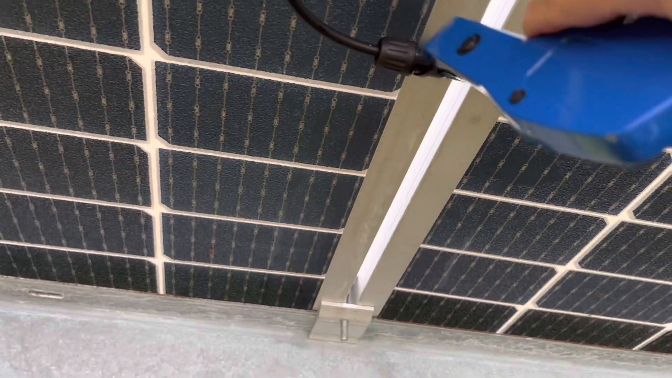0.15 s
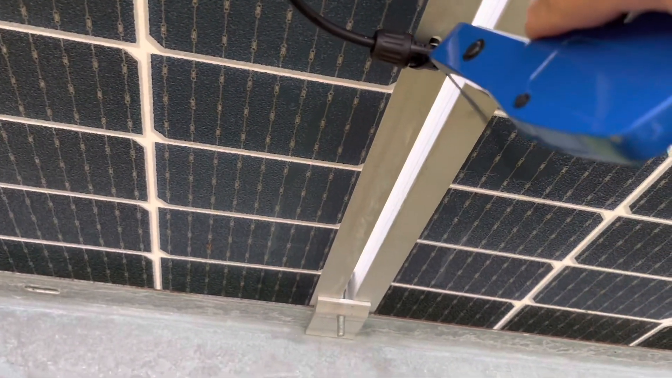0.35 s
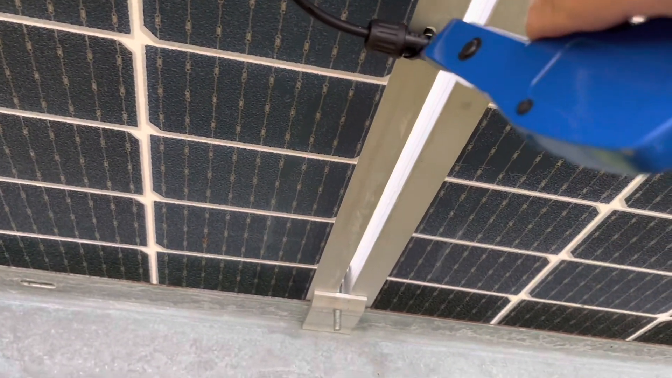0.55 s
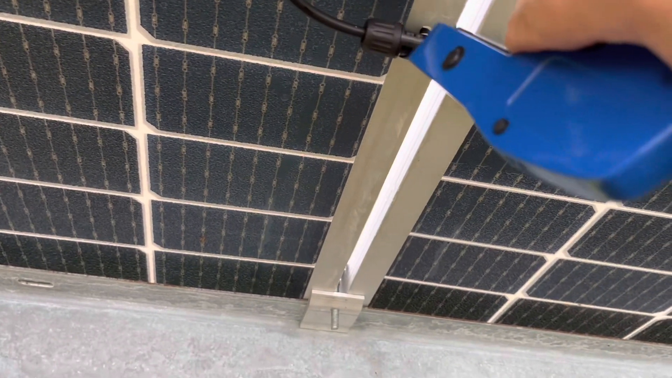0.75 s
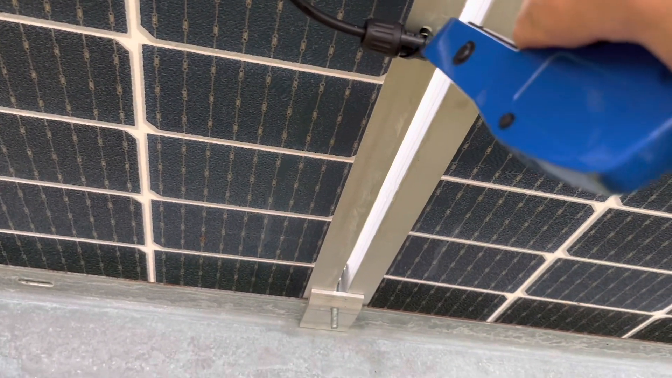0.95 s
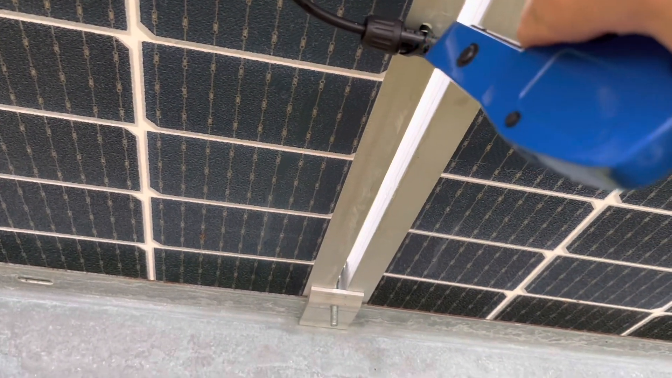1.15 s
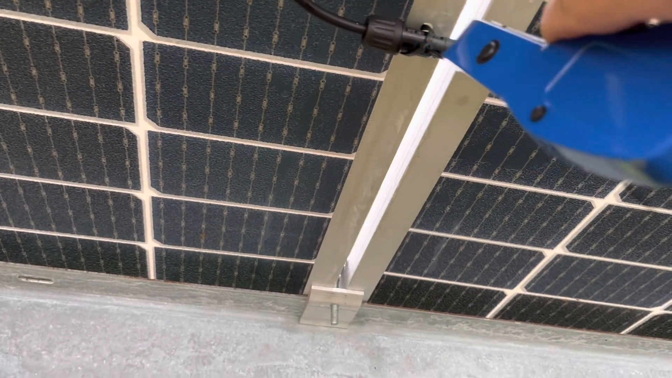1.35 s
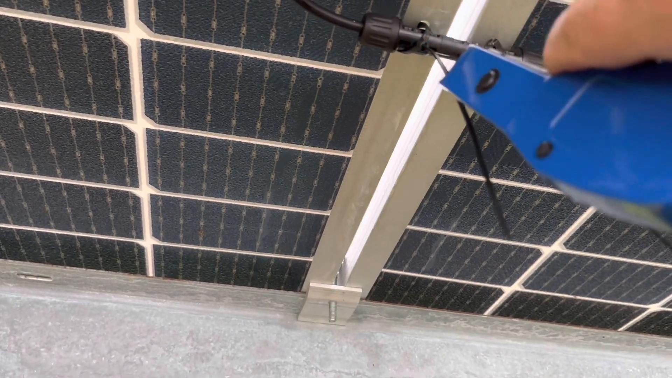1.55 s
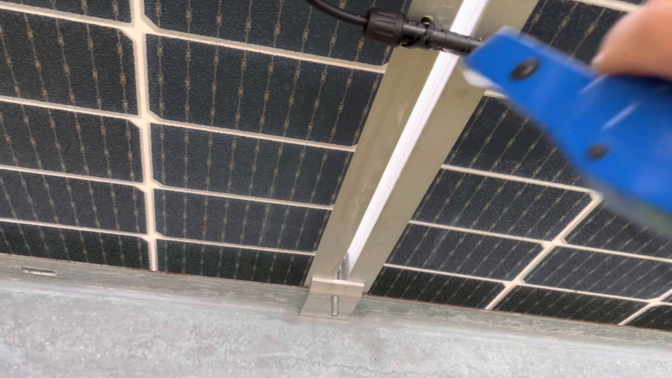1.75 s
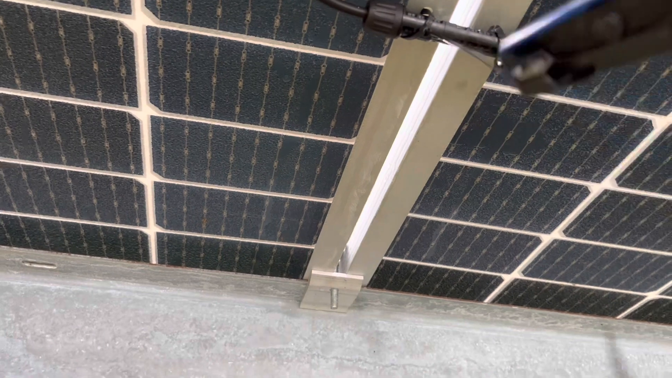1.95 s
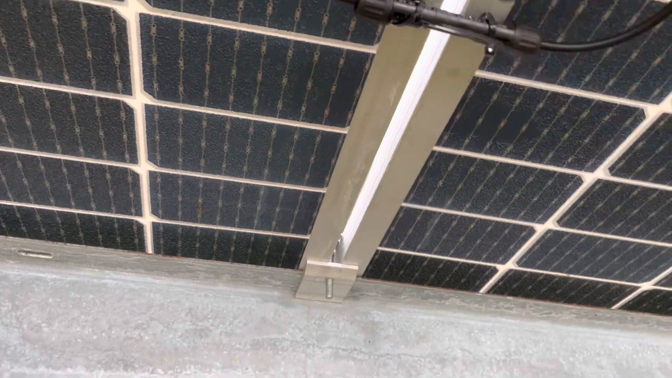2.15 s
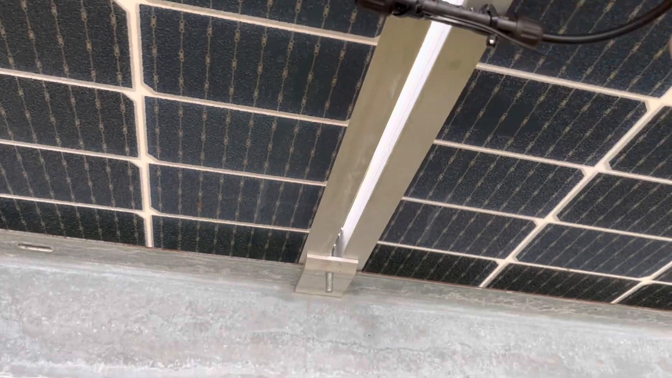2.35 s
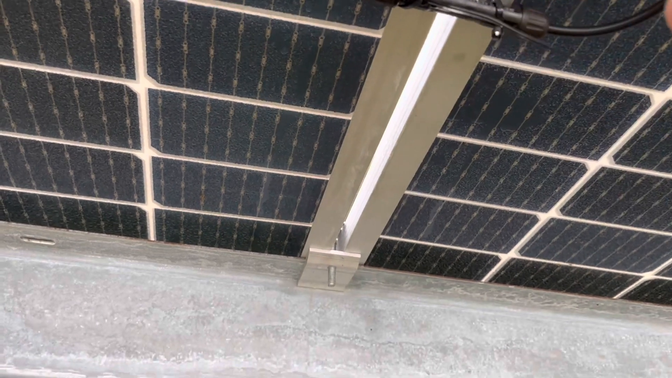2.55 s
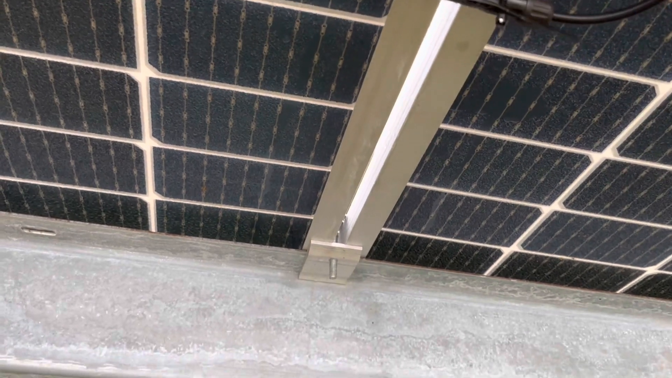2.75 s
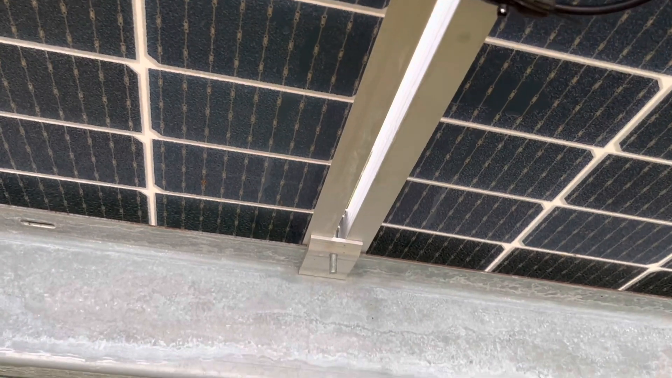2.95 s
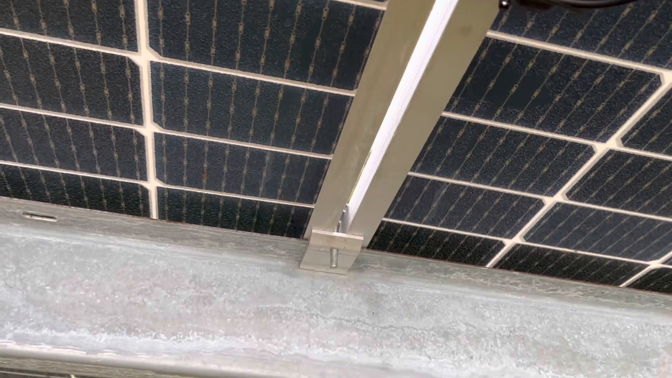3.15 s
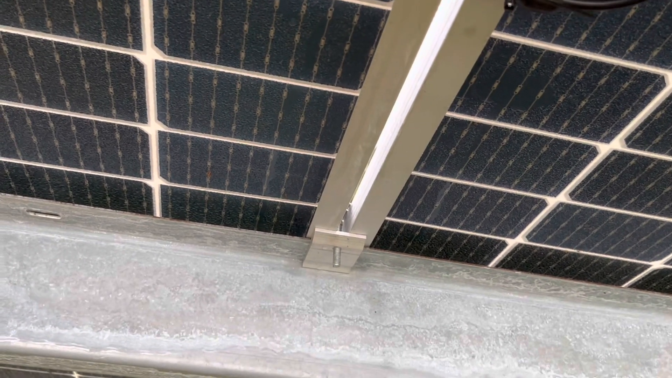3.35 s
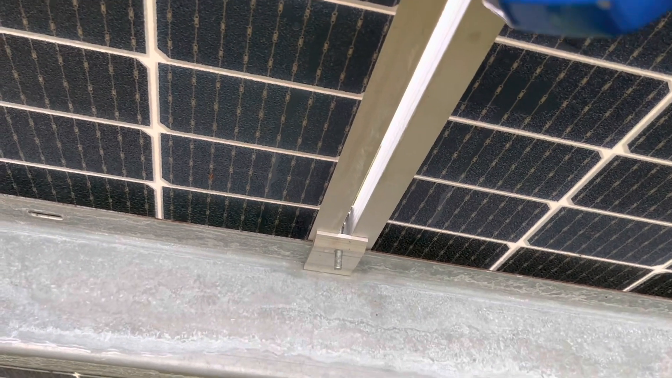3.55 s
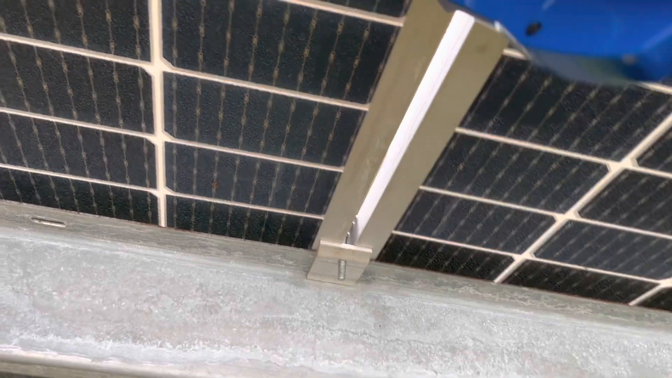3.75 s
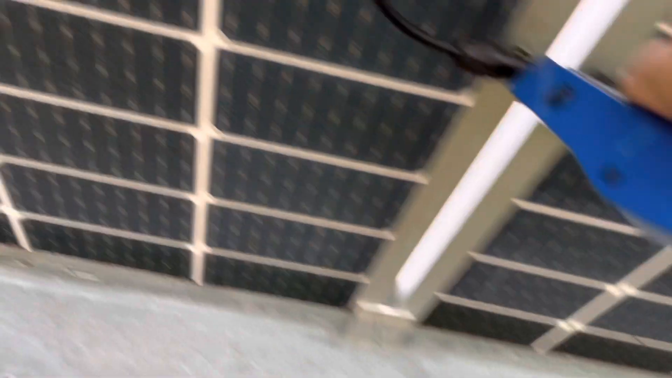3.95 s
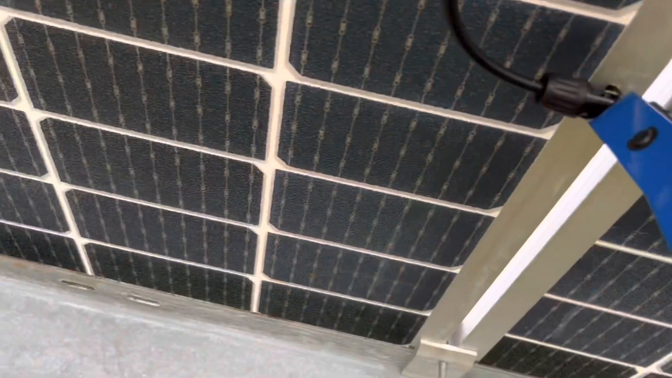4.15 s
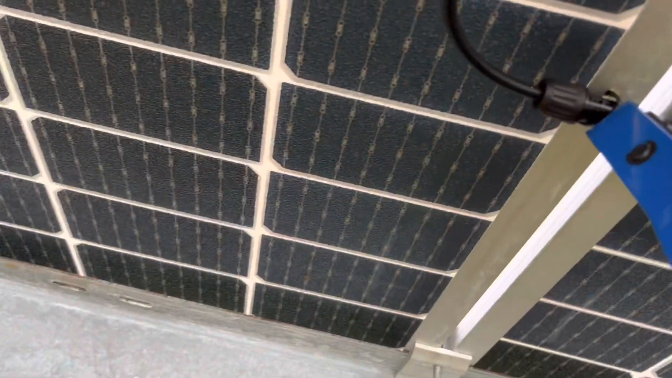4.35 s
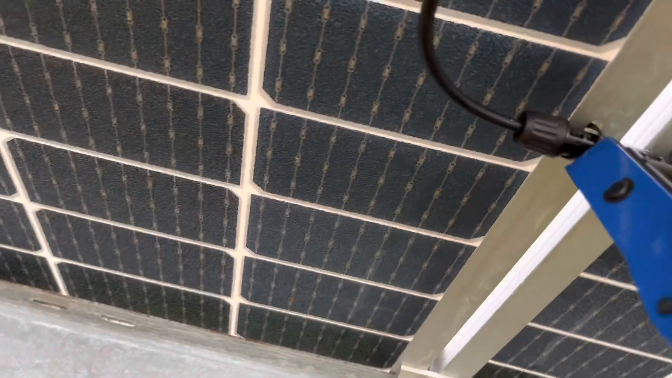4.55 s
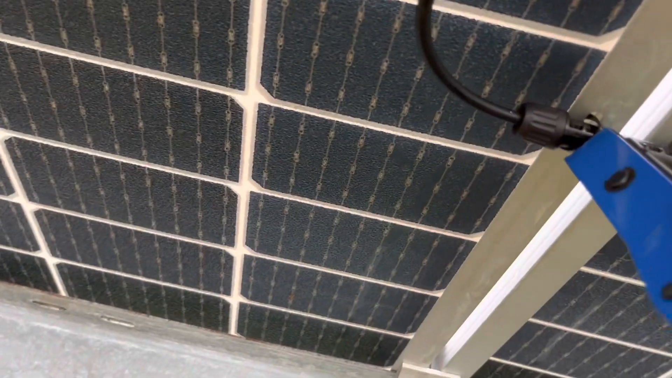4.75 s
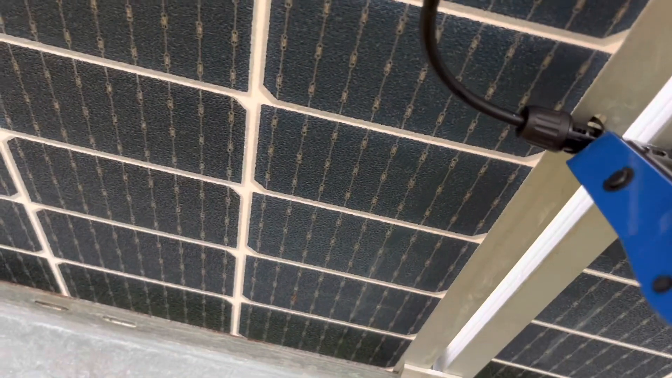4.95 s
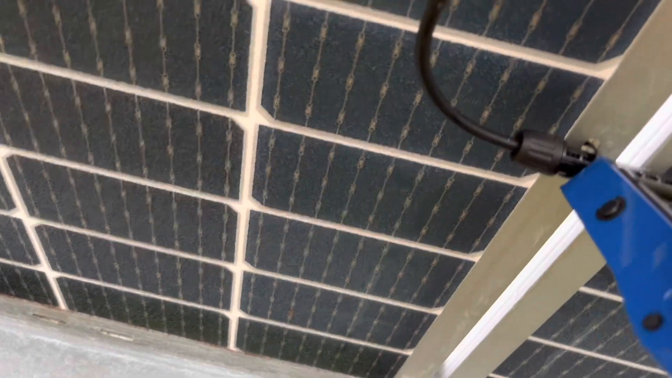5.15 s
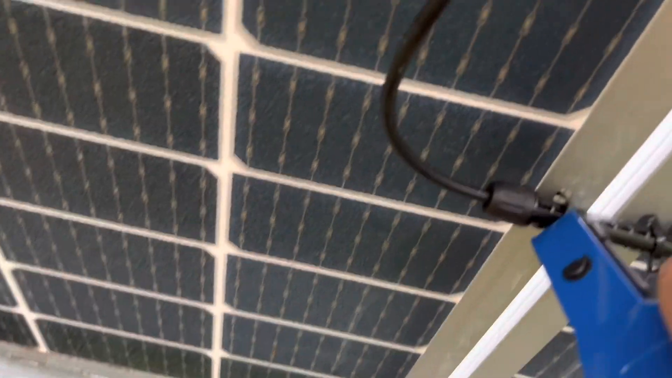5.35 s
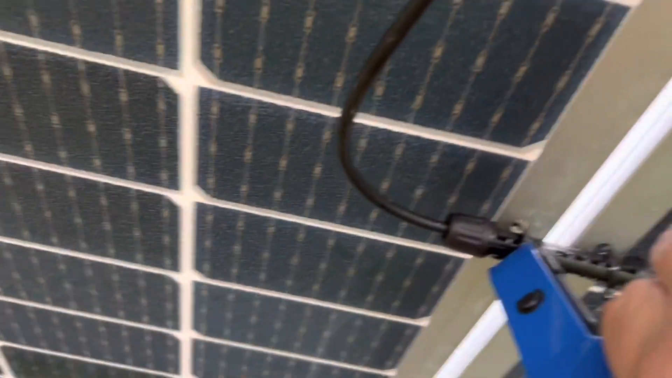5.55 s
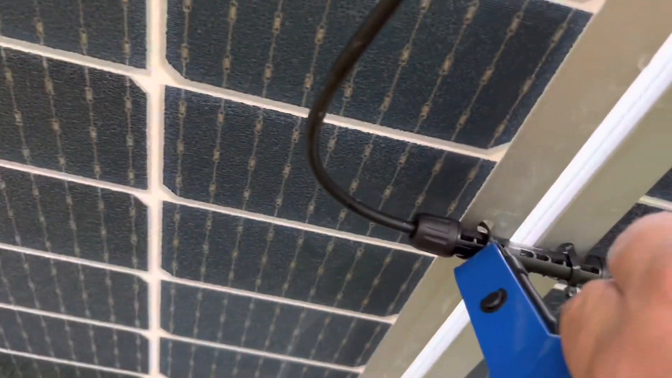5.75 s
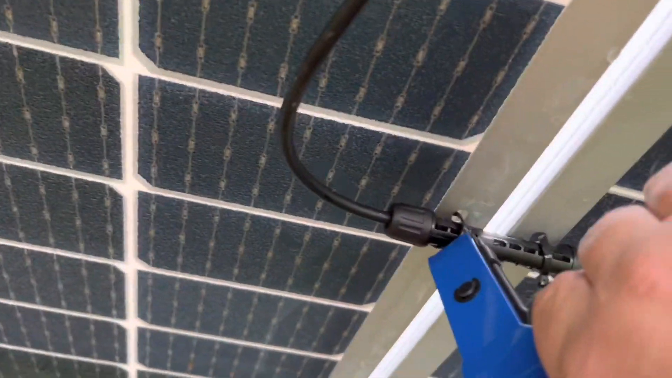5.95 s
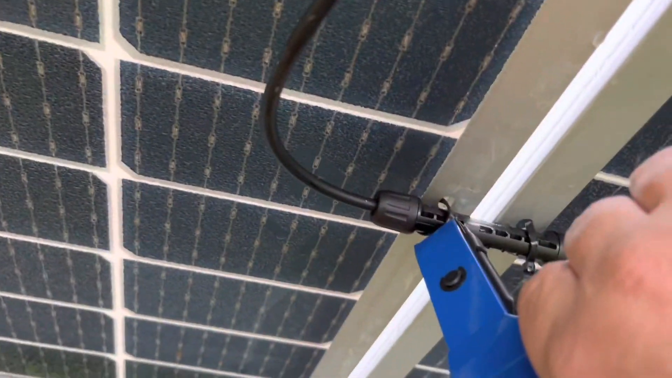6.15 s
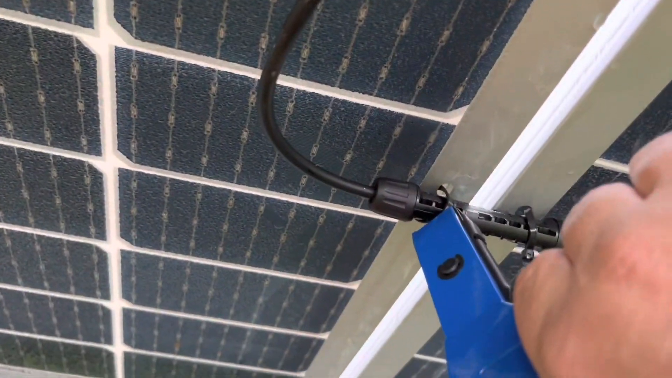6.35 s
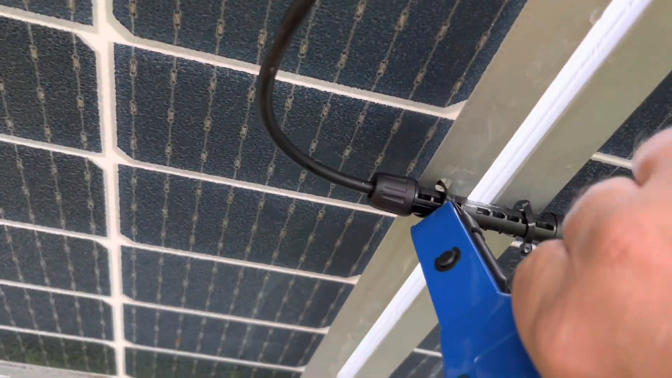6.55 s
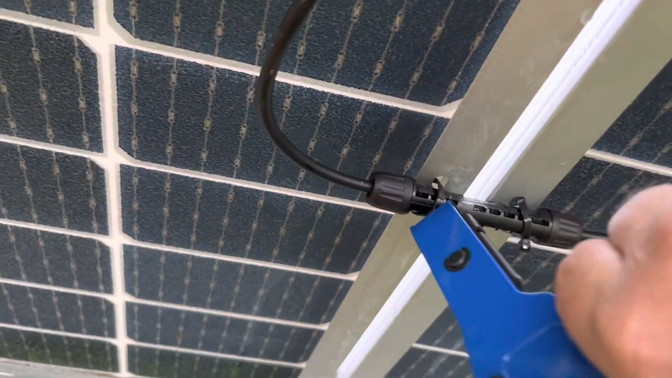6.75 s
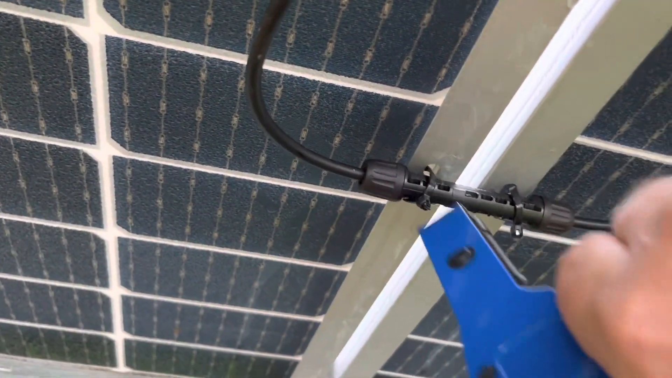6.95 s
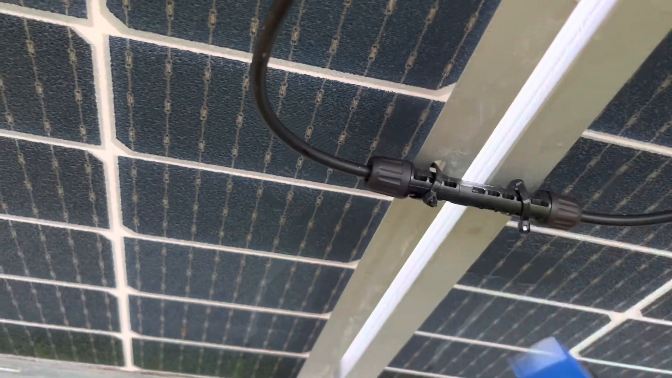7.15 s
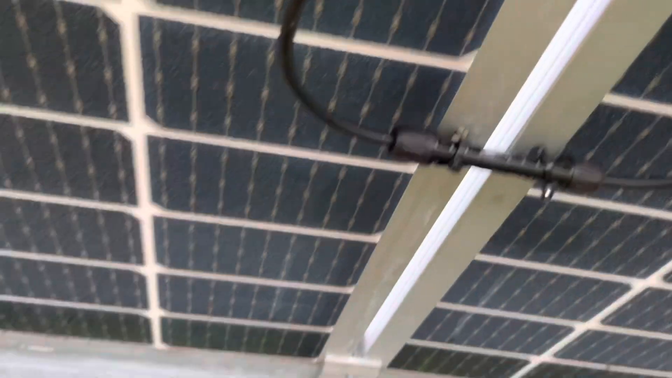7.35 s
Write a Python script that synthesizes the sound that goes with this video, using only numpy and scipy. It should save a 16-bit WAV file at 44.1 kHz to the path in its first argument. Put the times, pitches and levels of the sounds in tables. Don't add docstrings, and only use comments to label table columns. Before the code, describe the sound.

Outdoors, close to the microphone, gusty low wind rumble and a very faint high insect hiss continue for about 7.4 seconds. From 0 to 0.7 a hand rubs the tool grip, with a nose knock at 0.2, plastic scrapes, short hollow squeaks and small ticks. Strong ratchet ticks come at 1.33 and 1.78, with squeaky slides between 1.4 and 2.0 and a click at 2.26. It then quiets; a faint far bird chirps around 2.9 and 3.3. Soft bumps and rubbing return at 3.6, a dull bump at 4.15, and a bright cluster of ticks at 4.45. A short knock sounds at 5.44. Light clicks and rasping build from 6.1, then at 6.62 the tie snaps extremely loudly: sharp crack, ringing steel, rail rattle and deep boom. The tool knocks back at 6.94, and wind and a faint chirp remain.

```python
import sys
import numpy as np
from scipy import signal
from scipy.fft import rfft, irfft
from scipy.io import wavfile

SR = 44100
rng = np.random.default_rng(int(sys.argv[2]) if len(sys.argv) > 2 else 0)


def transcribe(signal):
    frames = np.atleast_2d(signal).T
    limited = np.clip(frames, -1, 1)
    pcm = np.round(limited * 32767).astype(np.int16)
    wavfile.write(sys.argv[1], SR, pcm)


N = 325899


def from_db(db):
    return 10 ** (np.asarray(db) / 20)


def in_time(rows):
    s, *columns = np.transpose(rows)
    return [np.interp(np.arange(N) / SR, s, c, left=-120, right=-120) for c in columns]


# f/Hz, side level/dB re mid
WIDTH = [(100, -15.5), (300, -10.5), (600, -5), (1200, 1), (2400, -9), (4400, -5), (8000, 3), (13000, -10)]


def coloured(spectrum, side=WIDTH, shared=0):
    log_hz = np.log(np.arange(1, N // 2 + 2) * SR / N)

    def at_hz(points):
        hz, db = np.transpose(points)
        return np.interp(log_hz, np.log(hz), db)

    white = rfft(rng.standard_normal((2, N)))
    mid = irfft(white[0] * from_db(at_hz(spectrum)), N)
    shared = np.clip(shared, 0, 1)
    mixed = np.sqrt(1 - shared ** 2) * white[1] + 1j * shared * white[0]
    wide = irfft(mixed * from_db(at_hz(spectrum) + at_hz(side)), N)
    return np.array([mid + wide, mid - wide]) / mid.std()


def band(x, low_hz, high_hz):
    return signal.sosfilt(signal.butter(2, [low_hz, high_hz], "band", fs=SR, output="sos"), x)


def resonance(x, hz, width):
    r = np.exp(-np.pi * width / SR)
    poles = [1, -2 * r * np.cos(2 * np.pi * hz / SR), r * r]
    return signal.lfilter((1 - r * r) / 2 * np.array([1, 0, -1]), poles, x)


def steep(x, hz, width):
    return resonance(resonance(x, hz, width), hz, width)


def ring(s, hz, db, t60, rise=0.00033):
    age = np.maximum(np.arange(N) / SR - s, 0)
    envelope = from_db(db - 60 * age / t60) * (1 - np.exp(-age / rise))
    return envelope * np.sin(2 * np.pi * hz * age)


def bursts(times, peaks_db, t60s, rise=0.00028):
    out, age = np.zeros(N + SR), np.arange(SR // 2) / SR
    for s, db, t60 in zip(times, peaks_db, t60s):
        i = round(s * SR)
        out[i:i + len(age)] += from_db(db - 60 * age / np.maximum(t60, .002)) * (1 - np.exp(-age / rise))
    return out[:N]


def strokes(middles, lengths, levels_db):
    t, out = np.arange(N) / SR, 0
    for s, length, db in zip(middles, lengths, levels_db):
        out = out + from_db(db) * np.cos(np.pi * np.clip((t - s) / length, -.5, .5)) ** 2
    return out


def taps(times, peaks_db, low_hz, high_hz):
    train = np.zeros((2, N))
    at = np.round(times * SR).astype(int)[:, None] + rng.integers(0, 4, (len(times), 2))
    train[0, at[:, 0]] = train[1, at[:, 1]] = from_db(peaks_db) * SR / 2 / (high_hz - low_hz)
    return band(train + 1e-18, low_hz, high_hz)


def flutter(rate, depth_db):
    knots = rng.standard_normal(int(N / SR * 60) + 2)
    position = np.arange(N) / SR * np.minimum(rate, 59)
    return from_db(depth_db * np.interp(position, np.arange(len(knots)), knots))


def unit(x):
    return x / x.mean(axis=0).std()


# f/Hz, density/dB
AIR = [(200, -10), (300, -3), (500, -11), (900, -19.5), (1500, -19.5), (2000, -23), (2600, -29),
       (3100, -27), (4300, -31), (5300, -32), (7800, -33), (10300, -38), (11500, -62)]
# f/Hz, width/Hz, level/dB rms, side level/dB re mid
INSECTS = [
    (3506, 730, -83, -1.5),
    (6000, 610, -83, -6.5),
    (6786, 1000, -72, 0.5),
    (9235, 750, -72, 7.5),
]


def outdoors():
    air_side = [(300, -10.5), (1400, 2.0), (6000, 1.0)]
    out = from_db(-75.5) * flutter(2.5, 1.7) * coloured(AIR, side=air_side)
    for hz, width, level_db, side_db in INSECTS:
        wings = resonance(rng.standard_normal((2, N)), hz, width)
        mid, side = band(wings, hz - 0.53 * width, hz + 0.47 * width)
        stereo = mid + from_db(side_db) * side * [[1], [-1]]
        out += from_db(level_db) / mid.std() * flutter(1.5, 0.51) * stereo
    return out


# t/s, length/s, start f/Hz, end f/Hz, level/dB
BIRD = [(2.87, .045, 2570, 3030, -74), (2.904, .025, 2990, 4280, -68), (2.925, 0.047, 4200, 2660, -68.5),
        (3.299, .07, 1900, 2500, -81), (3.355, .03, 2590, 3300, -70), (3.385, 0.11, 2900, 3500, -74),
        (3.5, .07, 2800, 2720, -83), (4.714, 0.018, 2300, 2840, -70.5), (4.931, 0.023, 2190, 2500, -74),
        (5.018, 0.014, 2280, 3120, -68.5), (6.83, 0.075, 3590, 3000, -73.5), (7.068, .06, 2990, 4170, -72)]


def bird():
    t, song = np.arange(N) / SR, np.zeros(N)
    for s, length, start_hz, end_hz, db in BIRD:
        u = np.clip((t - s) / length, 0, 1)
        cycles = length * (start_hz * u + (end_hz - start_hz) * u * u / 2)
        song += from_db(db) * np.sin(np.pi * u) * np.sin(2 * np.pi * cycles)
    air = rng.standard_normal((2, SR // 2))
    song *= 1 + .6 * unit(band(np.resize(air, (1, N)), 60, 300))[0]
    echoes = air * from_db(-25 - 60 * t[:SR // 2] / .25)
    return signal.fftconvolve(song[None], echoes, axes=1)[:, :N]


# t/s, level/dB
WIND = [(0.0, -48), (0.29, -45), (0.72, -50), (1.11, -55.5), (1.5, -54.5), (2.0, -55), (2.24, -51.5),
        (2.55, -55), (2.9, -54), (3.21, -47.5), (3.77, -50.5), (4.11, -46), (4.63, -55), (5.15, -53),
        (5.4, -46.5), (5.9, -50.5), (6.57, -56), (7.39, -58)]
# f/Hz, density/dB
RUMBLE = [(12, -65.5), (20, -38.5), (27, -20.5), (42, -12.5), (98, 0.5), (129, 0), (157, -13), (170, -14.5),
          (220, -45.5), (370, -120)]
# f/Hz, density/dB
UPPER_RUMBLE = [(88, -40), (150, -10), (194, -1), (234, -6.5), (258, -18.5), (302, -22.5), (500, -52),
                (650, -62.5), (1100, -120)]
# t/s, peak level/dB, t60/s
JOLTS = [
    (6.64, -23, 0.31),
    (6.78, -35.5, 0.82),
    (6.85, -35, 0.38),
    (7.0, -45.5, .8),
]


def wind():
    wind_db, = in_time(WIND)
    low = from_db(wind_db + 1.5) + bursts(*np.transpose(JOLTS), rise=.025)
    low = low * flutter(12, 1.7)
    flap = from_db(-61.5 + 0.42 * (wind_db - wind_db.mean()))
    shaken = from_db(0.5) * strokes(*np.transpose(SQUEEZES)[:3])
    upper = (flap + shaken) * from_db(3.0) * flutter(18, 3.4)
    return (low * coloured(RUMBLE, side=[(20, -16.0), (200, -22)])
            + upper * coloured(UPPER_RUMBLE, side=[(150, -20), (500, -7)]))


# f/Hz, width/Hz, level/dB
HOUSING = [(1840, 205, 4), (2095, 190, 5), (2315, 310, -8), (2744, 170, -11)]


def housing(x):
    return unit(sum(from_db(db) * steep(x, hz, width) for hz, width, db in HOUSING))


# middle t/s, length/s, grip level/dB, housing level/dB re grip
SQUEEZES = [(0.1, 0.66, -71, -3.5), (0.418, 0.32, -60.5, -13), (0.578, .26, -60.5, -5),
            (1.0, 0.28, -78.5, -3), (1.424, 0.5, -61, -9), (1.723, .36, -62.5, -2.5),
            (2.33, 0.24, -84, -16), (3.662, .55, -66, -13), (3.986, 0.49, -67.5, -14),
            (4.152, 0.16, -56.5, -20), (4.533, 0.4, -70, -9), (5.047, 0.34, -80.5, -11),
            (5.788, 0.49, -77, -3.5), (6.397, 0.42, -77.5, 4), (6.78, 0.22, -57.5, -31),
            (6.941, 0.35, -61.5, -18)]
# middle t/s, length/s, rasp level/dB, housing level/dB re rasp
SCRAPES = [(0.068, 0.11, -71.5, -5), (0.37, 0.053, -74, 2), (0.453, 0.24, -83, 8), (0.569, 0.11, -62.5, 0),
           (1.422, 0.094, -61, 1.5), (1.495, 0.13, -76, -16), (1.719, 0.12, -58, -5),
           (1.949, 0.12, -66, -2), (2.271, 0.032, -57, -6), (2.297, 0.086, -64, -5.5),
           (3.69, 0.12, -71.5, 2), (4.027, 0.08, -77, -5), (4.494, 0.21, -65, -11),
           (4.892, 0.38, -78.5, -10), (6.017, 0.13, -78.5, -22), (6.23, 0.099, -74, -4),
           (6.37, 0.18, -64, -7)]
# middle t/s, length/s, hiss level/dB
BRUSHES = [(0.065, 0.11, -81), (1.206, 0.046, -81), (1.843, 0.051, -77), (2.757, 0.11, -75),
           (3.685, 0.11, -72.5), (4.416, 0.12, -77), (4.735, 0.12, -82), (4.892, 0.3, -81),
           (6.017, .11, -86), (6.096, .06, -85), (6.227, 0.087, -75), (6.372, 0.2, -67), (6.54, 0.13, -74),
           (6.784, 0.16, -78)]


def rubbing():
    s, length, grip_db, hollow_db = np.transpose(SQUEEZES)
    scrape_s, scrape_length, rasp_db, housing_db = np.transpose(SCRAPES)
    scraping = strokes(scrape_s, scrape_length, rasp_db)
    brushing = strokes(*np.transpose(BRUSHES))
    slips = (rng.random(N) < 90 / SR) * from_db(2.0 * np.minimum(rng.exponential(1, N), 2) - 5)
    grain = 1 + signal.lfilter([1], [1, -.994], slips)
    smooth = coloured([(200, 0.011), (16000, 0.013)])
    rough = grain * flutter(35, 2.9) * smooth

    squeeze = strokes(s, length, grip_db + 1.0) * flutter(28, 3.25)
    dull = band(band(smooth + 0.5 * rough, 250, 660), 170, 640) + .9 * resonance(smooth, 300, 76)
    grip = squeeze * (unit(dull) + from_db(-9) * unit(band(smooth, 650, 1200)))

    hollow = strokes(s, length, grip_db + hollow_db - 2.0)
    hollow = hollow + strokes(scrape_s, scrape_length, rasp_db + housing_db)
    body = hollow * housing(rough)

    rasp = (scraping + from_db(-4) * brushing) * unit(band(rough, 900, 6400))
    hiss = (brushing + from_db(-11) * scraping) * unit(band(band(rough, 10300, 14300), 9000, 14600))
    return grip + body + rasp + hiss


# middle t/s, length/s, f/Hz, width/Hz, level/dB
SQUEAKS = [(0.35, .035, 2050, 280, -68), (0.372, .03, 2050, 200, -66), (0.44, .22, 1550, 450, -71),
           (0.45, .26, 330, 200, -60), (0.66, .05, 2000, 350, -68), (0.925, .04, 2100, 600, -68),
           (1.34, .05, 2700, 300, -64), (2.29, .07, 2700, 500, -66), (4.49, .09, 600, 500, -62),
           (0.405, .06, 2030, 250, -67), (0.44, .05, 2050, 300, -68), (0.485, .08, 2050, 250, -68),
           (0.572, .07, 1860, 90, -63), (0.255, .11, 1100, 250, -68), (0.5, .1, 600, 300, -63),
           (1.42, .08, 2050, 300, -63), (1.43, .07, 650, 400, -62), (1.505, .08, 2000, 200, -68),
           (1.582, .04, 2150, 200, -68), (1.718, .05, 1850, 110, -59), (1.712, .07, 2150, 300, -60),
           (1.925, .045, 2000, 400, -62), (1.915, .03, 2600, 200, -65), (1.97, .05, 2280, 150, -63),
           (1.963, .025, 4300, 900, -65), (3.605, .05, 2050, 200, -71), (3.6, .04, 520, 200, -58),
           (3.685, .06, 2120, 130, -65), (3.705, .05, 1830, 130, -66), (3.68, .08, 560, 300, -59),
           (4.145, .05, 2100, 600, -71), (6.23, .06, 1950, 300, -71), (6.375, .04, 2080, 120, -64),
           (6.407, .035, 2030, 130, -61), (6.925, .03, 2000, 300, -65)]


def squeaks():
    out, white = np.zeros((2, N)), coloured([(200, 0), (16000, 0)], shared=.6)
    for s, length, hz, width, db in SQUEAKS:
        a, b = round((s - length) * SR), round((s + length) * SR)
        tone = unit(steep(white[:, a:b], hz, width))
        swell = np.cos(np.pi * np.clip((np.arange(a, b) / SR - s) / length, -.5, .5))
        out[:, a:b] += from_db(db) * swell * tone
    return out


# f/Hz, width/Hz, level/dB, t60/s
RAIL = [(295, 100, -36.5, 0.44), (420, 70, -35, 0.45), (490, 65, -39, 0.46), (640, 120, -48, .4),
        (910, 110, -43, 0.27), (1038, 150, -50, 0.44), (1460, 350, -46, 0.3), (1950, 400, -46, 0.28)]
# t/s, level/dB
RAIL_HITS = [
    (6.626, 1.5),
    (6.939, -10),
    (0.205, -13),
    (4.146, -20),
]
# f/Hz, level/dB, t60/s
RAIL_MODES = [(355, -42, .4), (420, -31, .35), (488, -37, .5), (600, -45, .5), (727, -50, .5),
              (1017, -46, .7), (909, -44, .3), (1120, -44, .2), (1346, -45, .17), (1459, -50, .27),
              (2326, -48, .14)]


def rail():
    noise = coloured([(200, 0.00074), (16000, 0.0026)])
    s, hit_db = np.transpose(RAIL_HITS)
    out = sum(ring(s[0], *mode, rise=.004) for mode in RAIL_MODES)
    for hz, width, db, t60 in RAIL:
        decay = t60 * from_db(.5 * hit_db)
        out = out + bursts(s, hit_db + db, decay, rise=0.0039) * unit(steep(noise, hz, width))
    return out


# t/s, peak level/dB, edge level/dB re peak
TICKS = [(0.059, -46.5, -1), (0.5087, -52, -4), (0.5728, -41, 4), (0.6174, -50, 3), (1.3281, -27.5, -7),
         (1.7783, -30, 2), (1.8485, -51, -10), (1.957, -47, -4), (2.2635, -40, 3.5), (2.7546, -58, 1),
         (4.0929, -37, -4), (4.4524, -25.5, 0.5), (4.4713, -30, -5), (4.4855, -27.5, -1.5),
         (4.5153, -46, -6.5), (4.5543, -43, 1), (4.5832, -50.5, -1), (5.3558, -45.5, -2), (6.1853, -60, 12),
         (1.759, -54, -4), (1.815, -54, -4)]
# t/s, peak level/dB, edge level/dB re peak
CLACKS = [(0.6439, -55, 7), (0.9098, -53.5, -22), (1.9088, -47, 1), (6.0889, -60, -2), (6.2008, -52, -5),
          (6.2673, -43.5, 1), (6.3192, -44.5, 0), (6.3357, -45, -3), (6.343, -36.5, -3), (6.403, -52, 0),
          (6.304, -54, -4), (6.417, -51.5, -6), (6.531, -54, -8)]
# t/s, peak level/dB, edge level/dB re peak
TOUCHES = [(0.2034, -43, -12), (0.2081, -35.5, -13), (0.3364, -56, -9), (0.366, -53, -17), (0.549, -45, -2),
           (0.5838, -44.5, -21), (1.209, -50, -14), (1.3936, -51, -7), (2.2897, -56, -11)]
# t/s, peak level/dB, edge level/dB re peak
BUMPS = [(3.31, -69, -17), (3.4686, -60, -16), (3.5892, -56.5, 4), (3.6884, -55.5, -6), (4.1454, -61, -5),
         (5.441, -42, -2), (6.9377, -42, 9), (6.9431, -57, 11)]
# t/s, f/Hz, peak level/dB, t60/s
KNOCKS = [(0.045, 420, -52, 0.2), (0.205, 468, -42.5, 0.057), (0.208, 1095, -57, 0.13),
          (1.33, 2190, -40.5, .05), (2.265, 2860, -51, 0.061), (2.266, 3780, -55, .04),
          (2.264, 420, -54.5, 0.052), (3.66, 560, -49.5, 0.08), (3.305, 632, -58, .08),
          (3.59, 522, -47, 0.074), (4.146, 310, -36.5, 0.045), (5.4432, 1550, -27, 0.011),
          (5.4432, 607, -41, 0.026), (5.836, 720, -49, 0.025), (5.396, 2200, -58, .008),
          (6.939, 740, -42, .05), (6.939, 1070, -42, .06), (6.939, 1500, -45, .06), (6.939, 2290, -45, .05),
          (6.939, 2800, -55, .06), (0.206, 2130, -46, .04), (6.626, 1955, -19, .025),
          (6.346, 800, -57, .04), (6.635, 430, -26, .1), (6.938, 490, -28, 0.05), (6.94, 910, -48, 0.051),
          (6.941, 1950, -38, 0.061)]
# f/Hz, level/dB re peak, t60/s
TRIGGER = [(2060, -2, .022), (2760, -6, .018)]
# f/Hz, density/dB
CRACK = [(1650, -6), (2800, -3), (3100, -7.5), (4770, -5.5), (6200, -7), (7070, -8.5), (7830, -10),
         (8480, -8), (10600, -5.5), (14100, -10.5), (16000, -44)]


def clicks():
    # knock level/dB re peak, housing level/dB re peak, t60/s
    kinds = [(TICKS, (-11.5, -12, 0.026)), (CLACKS, (-16, -6, .03)),
             (TOUCHES, (-4, -2.5, 0.034)), (BUMPS, (9, -14, 0.018))]
    contacts = [(*row, *kind) for rows, kind in kinds for row in rows]
    s, peak_db, edge_db, knock_db, housing_db, t60 = np.transpose(contacts)
    s = s + .0006
    crack, white = coloured(CRACK, shared=.7), coloured([(200, 0.011), (16000, 0)])
    out = taps(s, peak_db - 4, 2800, 6800)
    out += taps(s, peak_db + edge_db - 5.0, 9000, 14500)
    out += bursts(s, peak_db - 6.5, 0.45 * t60) * unit(band(crack, 2750, 7500))
    out += bursts(s, peak_db + edge_db - 5.5, 0.38 * t60) * unit(band(crack, 8700, 15000))
    out += bursts(s, peak_db + housing_db - 7.5, 1.15 * t60, rise=0.0013) * housing(white)
    out += bursts(s, peak_db + knock_db - 10, 1.67 * t60, rise=0.00083) * unit(band(white, 430, 1560))
    out += sum(ring(*knock, rise=0.00021) for knock in KNOCKS)
    for at, db, _ in CLACKS:
        out += sum(ring(at, hz, db + mode_db, mode_t60) for hz, mode_db, mode_t60 in TRIGGER)
    scatter = bursts(s, peak_db - 21.0, 3.0 * t60, rise=0.0013)
    return out + scatter * unit(band(crack, 1200, 13500))


# t/s, peak level/dB, t60/s
SNAP = [
    (6.6235, -5, .008),
    (6.6271, -3, .012),
    (6.6283, -8, .022),
]
# f/Hz, density/dB
SNAP_COLOUR = [(150, -37.5), (250, 1.5), (620, -11), (981, -11.5), (1490, -19), (1910, -5), (2200, -12.5),
               (2670, -4), (3350, -2.5), (3990, -11.5), (5100, -14.5), (6400, -3), (8180, -14), (8930, -7),
               (12500, -7.5), (14600, -17), (16500, -40)]
# f/Hz, level/dB, t60/s
SNAP_TAIL = [(1507, -18, .16), (2400, -15, .15), (3800, -20, 0.15), (6050, -16, .12), (9900, -23, 0.13),
             (12500, -18, 0.14)]
# f/Hz, level/dB
STRAIN = [(1000, -36), (1650, -35), (1950, -34.5), (2735, -29), (4947, -35), (6019, -31.5), (7700, -39.5),
          (10400, -51)]
# f/Hz, level/dB, t60/s
STEEL = [(2000, -23, 0.048), (2780, -22, .04), (5040, -24, 0.054), (5840, -22, 0.042),
         (11300, -28.5, 0.025)]
# t/s, f/Hz, peak level/dB, t60/s
BOOM = [
    (6.6355, 74, -7, 0.34),
    (6.629, 113, -8, .17),
    (6.6315, 175, -16, 0.17),
    (6.634, 60, -19, 0.3),
    (6.895, 60, -25, 0.41),
    (6.98, 39, -35.5, 0.83),
    (4.13, 83.8, -27.5, 0.23),
    (3.6, 134, -34, 0.11),
]


def snap():
    cut = SNAP[0][0]
    left = cut - np.arange(N) / SR
    swell = from_db(3 - 1100 * np.abs(left)) * (left > 0) * np.clip((.021 - left) / 0.0075, 0, 1)
    side = [(250, -14), (600, -9.5), (1500, -4), (2400, -7), (4000, -1), (8000, 5), (13000, -3.5)]
    noise = coloured(SNAP_COLOUR, side=side, shared=.9)
    out = swell * sum(from_db(db) * unit(steep(noise, hz, 350)) for hz, db in STRAIN)
    out += bursts(*np.transpose(SNAP), rise=.0001) * noise * 0.56
    fronts_s, fronts_db = np.array([6.6238, 6.6242, 6.6273, 6.6277]), np.array([-4, -9.0, -7, -7.5])
    out += taps(fronts_s, fronts_db, 1800, 13500)
    for mode in STEEL:
        out += ring(SNAP[1][0], *mode) * from_db(rng.normal(0, 2, (2, 1)))
    for hz, db, t60 in SNAP_TAIL:
        out += bursts([cut], [db], [t60], rise=0.009) * band(noise, hz / 1.1, min(hz * 1.28, 15000))
    boom = sum(ring(*mode, rise=.003) for mode in BOOM)
    return out + [np.roll(boom, 11), np.roll(boom, -11)]


def scene():
    background = outdoors() + bird() + wind()
    return background + rubbing() + squeaks() + rail() + clicks() + snap()


def roll_off(x):
    return signal.sosfilt(signal.butter(12, 16700, fs=SR, output="sos"), x)


def record(dry):
    ported = dry - 0.8 * resonance(dry, 8350, 650) - 0.57 * resonance(dry, 16500, 3500)
    level_db = 20 * np.log10(np.abs(ported).max(axis=0) + 1e-6)
    slope = np.arange(N) / SR * 60
    held_db = np.maximum.accumulate(level_db + slope) - slope
    duck_db = signal.lfilter([.002], [1, -.998], np.maximum(held_db + 18, 0))
    ducked = ported * from_db(-.45 * duck_db)
    low_pass = signal.cheby2(10, 60, 17300, fs=SR, output="sos")
    return roll_off(signal.sosfilt(low_pass, ducked))


dry = scene()
out = record(dry)
transcribe(out)
```